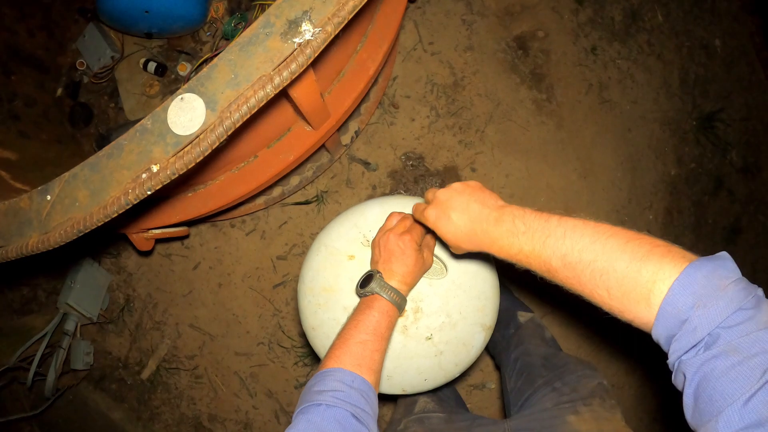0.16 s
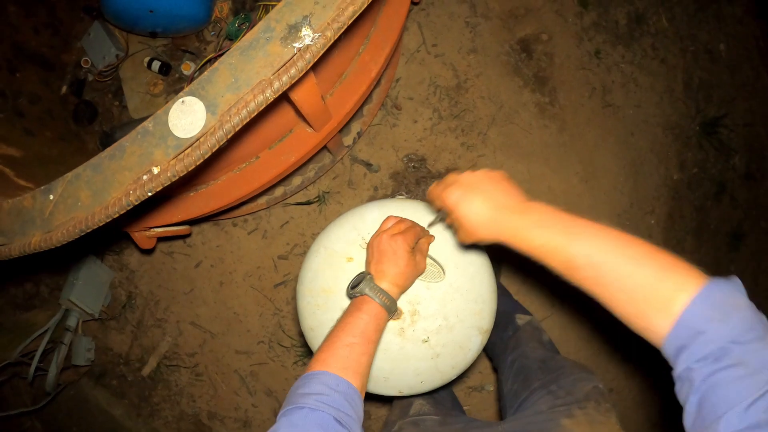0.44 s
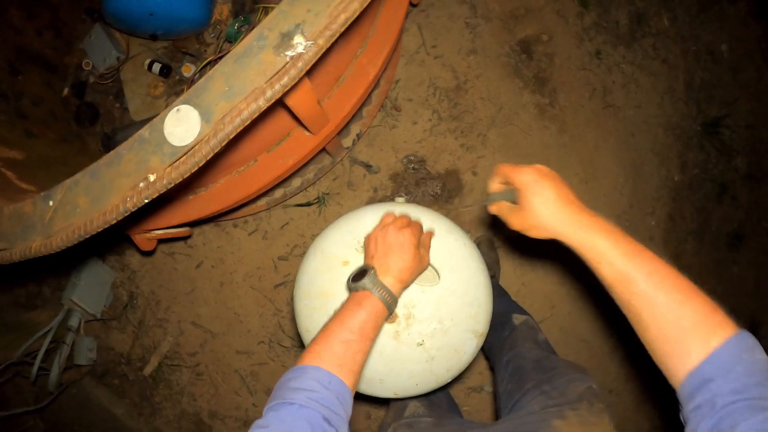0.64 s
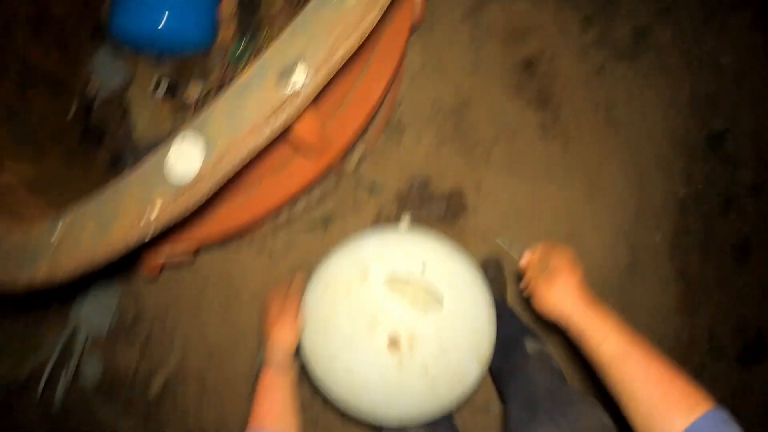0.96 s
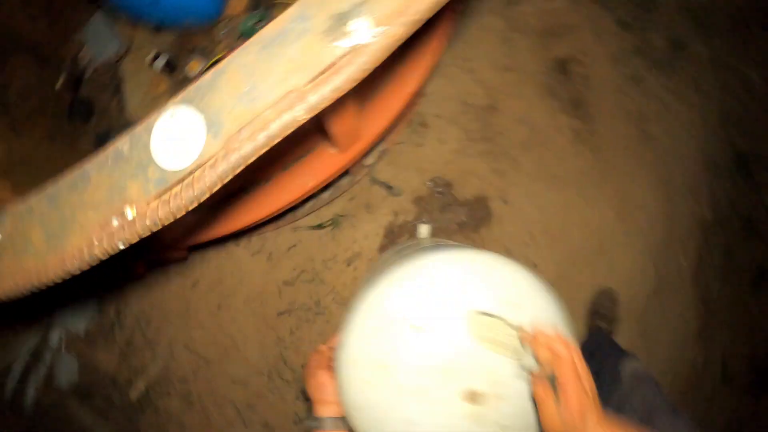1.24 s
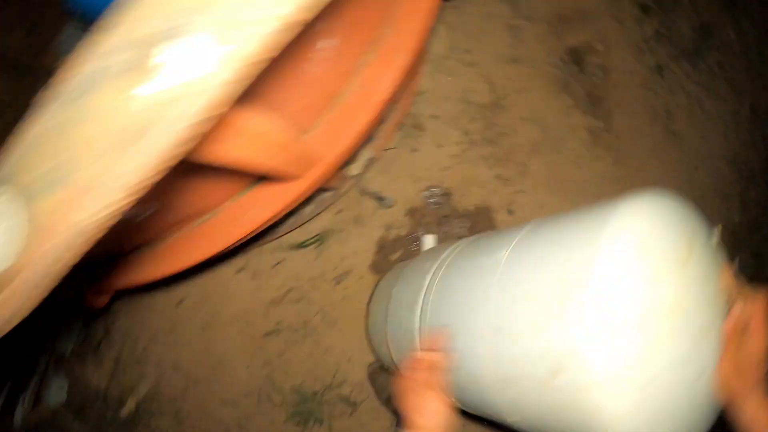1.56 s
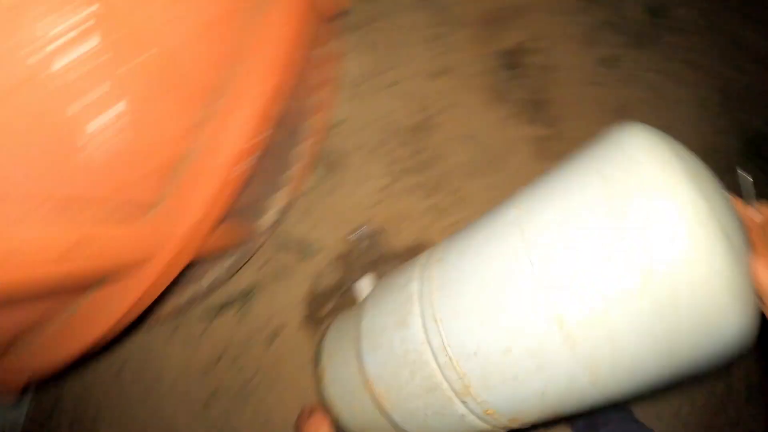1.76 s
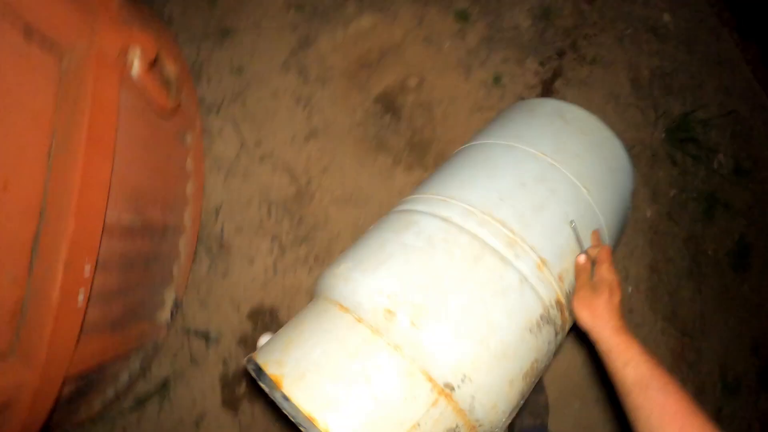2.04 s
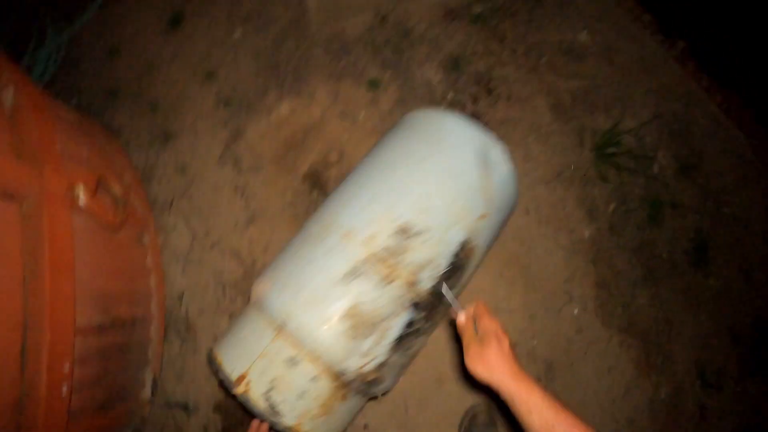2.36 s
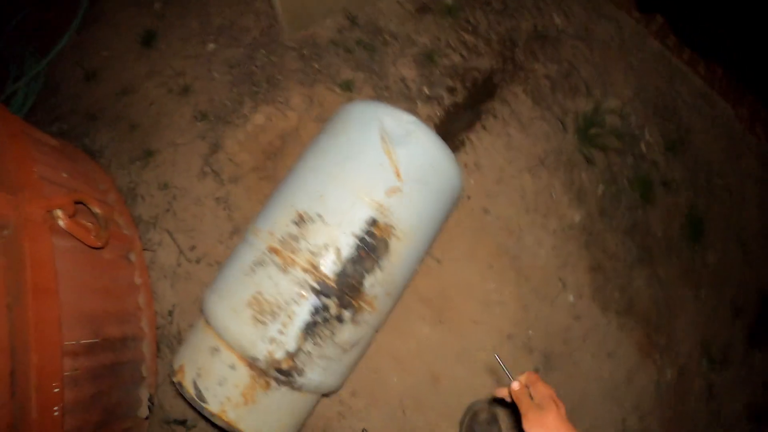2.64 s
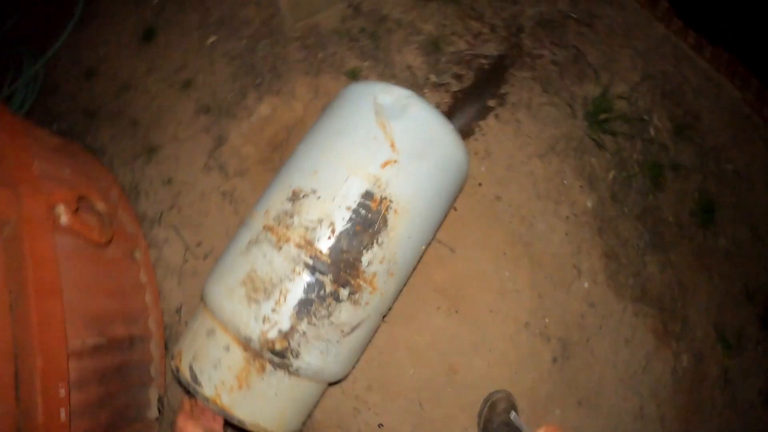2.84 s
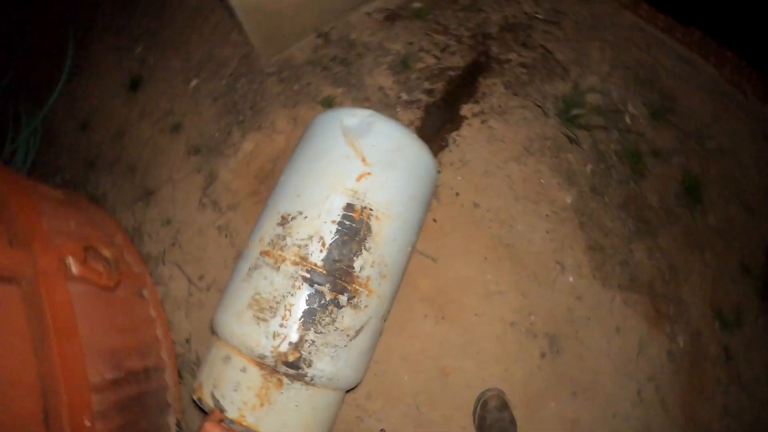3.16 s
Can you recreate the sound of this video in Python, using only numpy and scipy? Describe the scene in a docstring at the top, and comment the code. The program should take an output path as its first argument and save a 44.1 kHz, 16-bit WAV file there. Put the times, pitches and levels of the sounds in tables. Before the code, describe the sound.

Close outdoors, air squeezes from a steel tank's valve with thin, breathy whistles until 0.55 s, when it spits water and bursts into a strong bright hiss, weakening after 1.3 s and ending near 1.8. The tank lands with a short hollow knock at 1.87, stones cracking; grit scrapes and bumps until 2.65. Water then spurts and gulps until 3.05, leaving a trickle and plinks over low motor hum.

```python
"""Outdoors on stony dirt, close to a steel pressure tank being vented, with a motor humming low behind it.
Air leaks at the valve with breathy whistles, spits water, then rushes out in a weakening hiss: shaped noise.
The tank is tipped over: a knock excites its modes, stones crack in short noise bursts, and grains of grit
scrape as it is shoved across the dirt. Water spurts out as droplets, gulps and ringing bubbles, then trickles."""
import sys
import numpy as np
from scipy import signal
from scipy.fft import rfft, irfft
from scipy.io import wavfile

SR = 44100
rng = np.random.default_rng(int(sys.argv[2]) if len(sys.argv) > 2 else 0)


def wav_out(sig):
    """Save sig, one row per channel (or a flat mono array), as 16-bit PCM at SR to the path in sys.argv[1]."""
    wavfile.write(sys.argv[1], SR, np.round(np.clip(np.atleast_2d(sig).T, -1, 1) * 32767).astype(np.int16))


N = 145530
T = np.arange(N) / SR  # s
HZ = np.maximum(np.arange(N // 2 + 1) * SR / N, 1)  # spectrum bins, kept above zero for the logarithm


def from_db(db):
    """Decibels to gain."""
    return 10 ** (np.asarray(db) / 20)


def rms_one(x):
    """Scale to unit power."""
    return x / np.sqrt(np.mean(x ** 2) + 1e-20)


def in_time(rows):
    """Each column of a curve, interpolated at every sample."""
    s, *columns = np.transpose(rows)
    return [np.interp(T, s, c) for c in columns]


def level(rows):
    """Gain of a dB curve, fading quickly outside its span."""
    outside = np.maximum(rows[0][0] - T, 0) + np.maximum(T - rows[-1][0], 0)
    fade_s = .012
    return from_db(in_time(rows)[0]) * np.exp(-outside / fade_s)


def colour(x, points):
    """Filter by a spectrum of (Hz, dB) points, interpolated over log frequency."""
    hz, db = np.transpose(points)
    gain = from_db(np.interp(np.log(HZ), np.log(hz), db))
    return irfft(rfft(x) * gain, N)


def drift(rate):
    """Slow random motion of spread 1: noise that falls off above rate (Hz)."""
    return rms_one(irfft(rfft(rng.standard_normal(N)) / (1 + (HZ / rate) ** 2), N))


def rush(points, flutter_db, rate):
    """Turbulent coloured noise whose strength flutters."""
    flutter = from_db(flutter_db * drift(rate))
    return rms_one(colour(rng.standard_normal(N) * flutter, points))


def grains(per_s, spread_db):
    """Random clicks of uneven size and either sign."""
    excess = np.minimum(rng.exponential(1, N), 4)
    sizes = from_db(spread_db * excess) * rng.choice([-1, 1], N)
    return sizes * (rng.random(N) < per_s / SR)


def ring(x, hz, t60):
    """One mode, a two-pole resonator that decays by 60 dB in t60 seconds."""
    radius = from_db(-60 / (t60 * SR))
    w = 2 * np.pi * hz / SR
    # the tiny offset keeps the filter from stalling on vanishing numbers
    return signal.lfilter([0, np.sin(w)], [1, -2 * radius * np.cos(w), radius * radius], x + 1e-18)


def whistle(hz, width_hz):
    """A noisy resonance: two random envelopes on a carrier with a movable centre."""
    phase = 2 * np.pi * np.cumsum(hz) / SR
    return rms_one(drift(width_hz / 2) * np.cos(phase) + drift(width_hz / 2) * np.sin(phase))


def swell(s, rise_s):
    """Age of an event and its envelope, which rises to 1 and dies."""
    age = np.maximum(T - s, 0)
    return age, age / rise_s * np.exp(1 - age / rise_s)


def fade(s, hold_s, fall_s):
    """A sudden onset, a hold and an exponential fall."""
    return (T >= s) * np.exp(-np.maximum(T - s - hold_s, 0) / fall_s)


def jet():
    """The valve opens: turbulent air spits resonating water for a moment, then blows smoothly."""
    # the open jet of air: t/s, level/dB
    air_level = [(.543, -47), (.555, -19), (.577, -12), (.6, -19.5), (.66, -14), (.745, -21.5), (.79, -14),
                 (1.26, -15.5), (1.33, -19.5), (1.39, -24.5), (1.7, -25), (1.8, -29), (1.84, -59)]
    # spectrum of the jet: f/Hz, level/dB
    air_colour = [(300, -20.5), (800, -18.5), (1300, -13), (2200, -4.5), (4500, 0.5), (6700, -3.5),
                  (8300, -7.5), (9250, -2.5), (10400, -6.5), (12000, -17), (14000, -26), (16000, -37)]
    # water spat out with the air: t/s, level/dB, resonance f/Hz
    spit = [(.551, -21, 4640), (.577, -18, 4596), (.6, -18, 2800), (.62, -15.5, 1900), (.66, -18.5, 2598),
            (.708, -12, 2740), (.73, -13.5, 2130), (.752, -19.5, 1043), (.775, -29, 913)]
    # spectrum of the spitting: f/Hz, level/dB
    spit_colour = [(200, -17), (600, -12.5), (1200, 1), (2200, 2.5), (5000, -2.5), (7500, -16),
                   (14000, -48)]
    resonance_width_hz, resonance_db = 1370, -2

    air = rush(air_colour, flutter_db=0.33, rate=220)
    resonance = whistle(in_time(spit)[1], resonance_width_hz)
    wet = rush(spit_colour, flutter_db=1.3, rate=260) + from_db(resonance_db) * resonance
    return level(air_level) * air + level(spit) * rms_one(wet)


def leak():
    """Air squeezes past the valve as thin noise with two sliding, breathy whistles and a brief hoot."""
    # the first thin leak: t/s, level/dB
    hiss_level = [(0, -30.5), (.215, -30), (.23, -27), (.31, -20.5), (.34, -27.5), (.43, -25), (.46, -28),
                  (.5, -22.5), (.55, -26)]
    # spectrum of the leak: f/Hz, level/dB
    hiss_colour = [(300, -22), (500, -3), (950, -20), (1380, 5.5), (1900, -2), (4500, 0.5), (7200, -4),
                   (8600, -8), (9700, 0), (11500, -11), (15500, -31)]
    # the two whistles: t/s, lower f/Hz, lower level/dB, upper f/Hz, upper level/dB
    whistles = [(0, 4360, -36, 5100, -34.5), (.2, 4550, -39.5, 5360, -35.5), (.24, 4750, -32, 5360, -30.5),
                (.31, 4500, -33, 5430, -36), (.37, 4300, -29, 6420, -26), (.45, 4040, -28.5, 6130, -31.5),
                (.53, 3700, -28.5, 5760, -35), (.6, 3630, -62, 5700, -60)]
    width_hz = 950
    hoot_s, hoot_db, hoot_length_s, hoot_hz, hoot_width_hz = .18, -32, 0.026, 1430, 200

    low_hz, low_db, high_hz, high_db = in_time(whistles)
    tones = from_db(low_db) * whistle(low_hz, width_hz)
    tones = tones + from_db(high_db) * whistle(high_hz, width_hz)
    hoot_shape = np.exp(-.5 * ((T - hoot_s) / hoot_length_s) ** 2)
    hoot = from_db(hoot_db) * hoot_shape * whistle(np.full(N, hoot_hz), hoot_width_hz)
    hiss = level(hiss_level) * rush(hiss_colour, flutter_db=1.5, rate=91) * from_db(-3.0)
    return hoot + hiss + tones * (T < whistles[-1][0])


def tank(force):
    """A blow sets off the decaying modes of the water-damped shell, in alternating sign."""
    # modes of the tank: f/Hz, level/dB, t60/s
    modes = [(194, -4, 0.089), (309, -3.5, 0.24), (420, -8, 0.15), (613, 1.5, 0.12), (690, -7, 0.13),
             (770, -4, 0.19), (872, -5, 0.13), (1030, -8, 0.21), (1900, -12, 0.19)]
    return sum((-1) ** k * from_db(db) * ring(force, hz, t60) for k, (hz, db, t60) in enumerate(modes))


def knock():
    """The tank lands: one blow rings the shell while the soil thuds and crackles under it."""
    # spectrum of the thud: f/Hz, level/dB
    thud_colour = [(50, -7), (160, 3), (800, 2), (1200, -6), (3000, -0.5), (5000, -27)]
    landing_s, contact_s, fall_s, brightness_hz = 1.867, 0.013, .011, 3000
    ring_db, thud_db, crackle_db = -18.5, -22, -32

    blow = 1. * (np.arange(N) == int(landing_s * SR))
    dull = signal.butter(2, brightness_hz, fs=SR, output="sos")
    thud = signal.sosfilt(dull, colour(rng.standard_normal(N), thud_colour))
    soil = from_db(thud_db) * rms_one(thud) + from_db(crackle_db) * grit()
    return from_db(ring_db) * tank(blow) + fade(landing_s, contact_s, fall_s) * soil


def cracks():
    """Each stone under the shell gives a sharp, quickly dying noise burst around its own pitch."""
    # cracking stones: t/s, level/dB, f/Hz
    stones = [(1.822, -24.5, 3510), (1.862, -21.5, 1500), (1.866, -31.5, 9900), (1.892, -23.5, 3300),
              (1.938, -28, 2740), (2.408, -30, 2380), (2.47, -22.5, 3710)]
    rise_s, width_hz = .0025, 2000

    out = np.zeros(N)
    for s, db, hz in stones:
        _, shape = swell(s, rise_s)
        out += from_db(db) * shape * whistle(np.full(N, hz), width_hz)
    return out


def bumps():
    """Soft contacts make the heavy shell thump for a few cycles, with the deepest bass cut away."""
    # dull bumps as the tank settles: t/s, level/dB, f/Hz
    contacts = [(1.837, -21, 210), (1.848, -17.5, 195), (1.867, -21, 160), (2.355, -21, 283),
                (2.358, -20.5, 146), (2.432, -25, 347), (2.455, -27, 300), (2.477, -17.5, 185),
                (2.487, -21.5, 355)]
    rise_s, ragged_db, low_cut_hz = 0.004, 2.5, 89

    out = np.zeros(N)
    for s, db, hz in contacts:
        age, shape = swell(s, rise_s)
        out += from_db(db) * shape * np.sin(2 * np.pi * hz * age)
    ragged = out * from_db(ragged_db * drift(160))
    return signal.sosfilt(signal.butter(3, low_cut_hz, "high", fs=SR, output="sos"), ragged)


def grit():
    """Clumps of crushed grains, dense clicks whose strength wanders."""
    # spectrum of the grinding: f/Hz, level/dB
    grit_colour = [(150, -26), (400, 7.5), (750, -9.5), (1500, -7.5), (2600, 2), (4700, -0.5), (6000, -9),
                   (8500, -19), (9700, -17), (12000, -32), (15500, -45)]
    clump_db, clump_rate_hz = 1.8, 90
    clumps = from_db(clump_db * drift(clump_rate_hz))
    return rms_one(colour(grains(per_s=6000, spread_db=2.5) * clumps, grit_colour))


def shell():
    """Small stones tap the many high, short modes of the thin steel wall."""
    t60_s, taps_per_s = .08, 30  # for each mode
    pitches = np.geomspace(600, 4800, num=44) * rng.uniform(0.88, 1.03, size=44)
    return rms_one(sum(ring(grains(taps_per_s, spread_db=4.5), hz, t60_s) for hz in pitches))


def scrape():
    """Grit is crushed under the shell, which tinkles and sounds a hollow note."""
    # the tank grinding over dirt: t/s, level/dB
    scrape_level = [(1.77, -47), (1.815, -26.5), (1.84, -32), (1.92, -29), (1.945, -27), (1.975, -31),
                    (2.02, -26), (2.045, -32.5), (2.148, -35), (2.165, -26.5), (2.24, -26.5), (2.29, -39.5),
                    (2.33, -42), (2.348, -29.5), (2.38, -40), (2.45, -34), (2.476, -29), (2.492, -33.5),
                    (2.515, -37), (2.535, -28), (2.58, -32.5), (2.62, -32), (2.67, -40)]
    # the hollow note moves with the point of contact: t/s, f/Hz
    note_pitch = [(1.94, 720), (2.035, 669), (2.06, 1093), (2.49, 1131), (2.53, 620)]
    note_width_hz, note_db, shell_db = 75, -13, 0

    rasp = grit()
    note = whistle(in_time(note_pitch)[0], note_width_hz)
    return level(scrape_level) * rms_one(rasp + from_db(shell_db) * shell() + from_db(note_db) * note)


def water():
    """A gulping spurt of droplet clicks and spray falls back to a trickle with small ringing bubbles."""
    # water leaving the outlet: t/s, level/dB
    spurt_level = [(2.66, -51), (2.698, -24), (2.78, -24.5), (2.83, -22), (2.85, -27), (2.89, -24),
                   (3.0, -26.5), (3.025, -18.5), (3.048, -21.5), (3.07, -36), (3.15, -32.5), (3.3, -34.5)]
    # spectrum of the droplets: f/Hz, level/dB
    spurt_colour = [(200, -20), (450, -3), (1000, -7.5), (1550, -8), (2100, 0.5), (2450, -0.5), (2680, 5),
                    (3600, -1), (4700, -0.5), (6800, -6.5), (8500, -17), (9700, -10.5), (12000, -24),
                    (15500, -42)]
    # fine spray while air escapes with the water: t/s, level/dB
    spray_level = [(2.68, -64), (2.72, -32), (2.8, -33), (2.9, -27.5), (3.0, -24), (3.05, -47)]
    # spectrum of the spray: f/Hz, level/dB
    spray_colour = [(3000, -11), (6500, -0.5), (8700, -5.5), (9600, -1.5), (12000, -14.5), (15500, -31)]
    # the outlet gulps: t/s, level/dB, length/s
    gulp_rows = [(2.717, -28.5, 0.016), (2.781, -21.5, 0.01), (2.803, -28, 0.0085), (2.83, -25, 0.008)]
    # spectrum of the gulps: f/Hz, level/dB
    gulp_colour = [(120, -13), (400, 4), (900, -1), (1500, -5), (2200, 2.5), (4000, -41)]
    bubbles_per_s, bubble_cycles, bubble_db = 600, 53, -10.5  # cycles to fall by 60 dB

    splash = rms_one(colour(grains(per_s=12000, spread_db=1.5), spurt_colour))
    pitches = np.geomspace(1900, 5200, num=16)
    bubbles = np.zeros(N)
    for hz in pitches:
        births = grains(bubbles_per_s / len(pitches), spread_db=3.0)
        bubbles += ring(births, hz, bubble_cycles / hz)
    spurt = level(spurt_level) * (splash + from_db(bubble_db) * rms_one(bubbles))
    gulps = sum(from_db(db) * np.exp(-.5 * ((T - s) / length) ** 2) for s, db, length in gulp_rows)
    spray = level(spray_level) * rush(spray_colour, flutter_db=1.3, rate=89)
    return spurt + gulps * rush(gulp_colour, flutter_db=4.0, rate=100) + spray


def plinks():
    """Single plinks of water, each a brief ring with a little splash around it."""
    # plinks: t/s, level/dB, f/Hz
    drops = [(2.64, -24.5, 2890), (3.147, -29, 2663), (3.187, -28, 3040), (3.258, -20, 3010)]
    rise_s, splash_width_hz, splash_db = 0.0035, 1100, -4.5

    out = np.zeros(N)
    for s, db, hz in drops:
        age, shape = swell(s, rise_s)
        tone = 0.72 * np.sin(2 * np.pi * hz * age)
        splash = from_db(splash_db) * whistle(np.full(N, hz), splash_width_hz)
        out += from_db(db) * shape * (tone + splash)
    return out


def background():
    """A distant-sounding motor, rumbling noise with a few wavering lines, and faint night hiss."""
    # the background hum: t/s, level/dB
    hum_level = [(0, -32), (.3, -31), (.55, -35), (.8, -43), (1.4, -45), (1.8, -41.5), (2.3, -38),
                 (3.0, -35.5), (3.3, -32.5)]
    # spectrum of the rumble: f/Hz, level/dB
    hum_colour = [(20, -25), (60, -13.5), (85, -3), (125, -4.5), (178, 4), (260, -6), (450, -8), (900, -26),
                  (5000, -52)]
    # lines of the hum: f/Hz, level/dB
    hum_lines = [(86, -14.5), (114, -10), (192, -11.5)]
    # spectrum of the night air: f/Hz, level/dB
    air_colour = [(300, -3), (1200, 3.5), (3000, 5), (8000, -3.5), (9800, -2), (12000, -14), (15500, -41)]
    air_db = -38

    lines = np.zeros(N)
    for hz, db in hum_lines:
        wavering_hz = hz * (1 + 0.0295 * drift(18.2))
        lines += from_db(db) * np.sqrt(2) * np.sin(2 * np.pi * np.cumsum(wavering_hz) / SR)
    rumble = from_db(-1) * rush(hum_colour, flutter_db=1.4, rate=16)
    air = from_db(air_db) * rush(air_colour, flutter_db=4.0, rate=10)
    return level(hum_level) * (rumble + lines) + air


def scene():
    """Air, scrape and water get close reflections; all is nearly mono except in the top treble."""
    # echoes off ground and machinery nearby: delay t/s, level/dB
    echo_rows = [(.0031, -33), (.0074, -20.5), (0.0136, -19)]
    # side against mid: f/Hz, level/dB
    side_colour = [(50, -38), (400, -42.5), (10000, -54.5), (11000, -25), (12000, 1)]

    near = leak() + jet() + scrape() + water()
    echoes = sum(from_db(db) * np.interp(T - s, T, near, left=0) for s, db in echo_rows)
    mid = from_db(-0.78) * (near + echoes) + knock() + cracks() + bumps() + plinks() + background()
    # a wandering phase makes the side unlike the mid
    scrambled = np.real(signal.hilbert(mid) * np.exp(2j * np.pi * drift(20)))
    side = colour(scrambled, side_colour)
    return np.array([mid + side, mid - side])


def record(dry):
    """The microphone has a narrow treble dip; the highest peaks are rounded and the top is cut steeply."""
    peak_limit, cutoff_hz = .95, 15750
    dip_hz, dip_width_hz, dip_db = 8570, 200, -3.5

    rounded = dry / (1 + (dry / peak_limit) ** 6) ** (1 / 6)
    dip = from_db(dip_db * np.exp(-.5 * ((HZ - dip_hz) / dip_width_hz) ** 2))
    steep_cut = 1 / np.sqrt(1 + (HZ / cutoff_hz) ** 400)
    return irfft(rfft(rounded) * dip * steep_cut, N)


dry = scene()
out = record(dry)
wav_out(out)
```